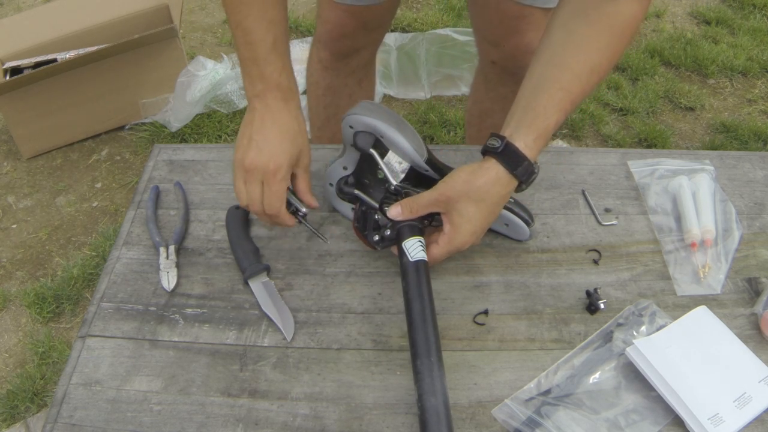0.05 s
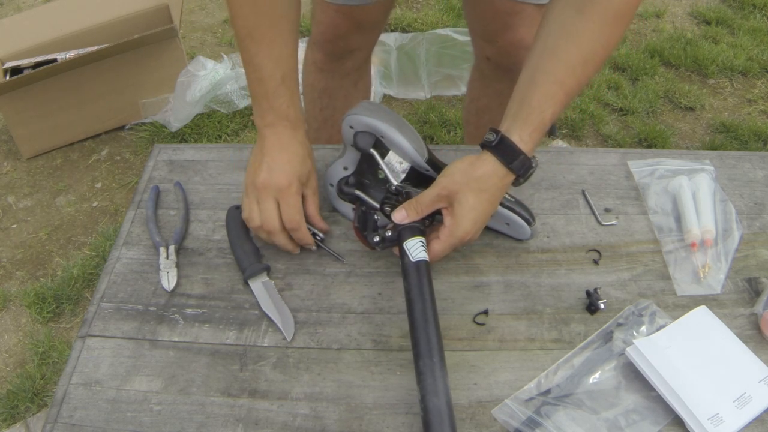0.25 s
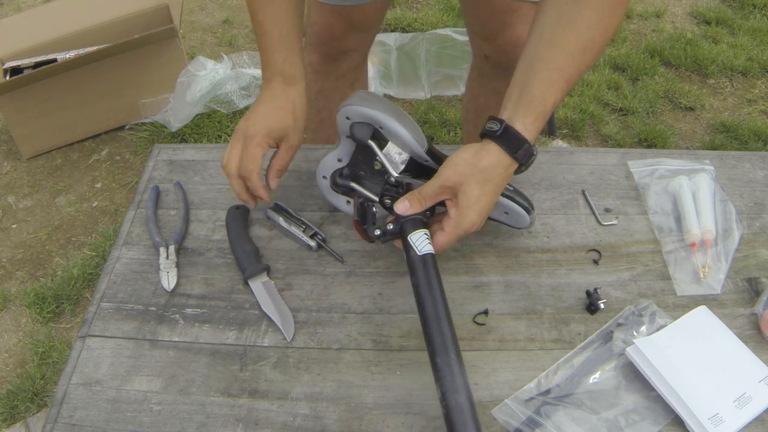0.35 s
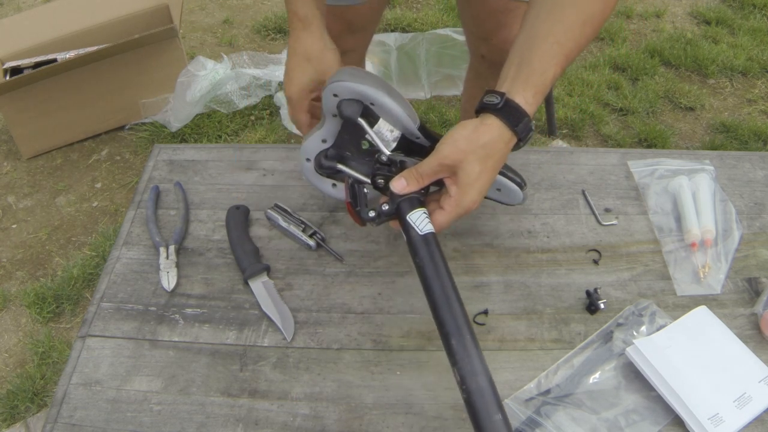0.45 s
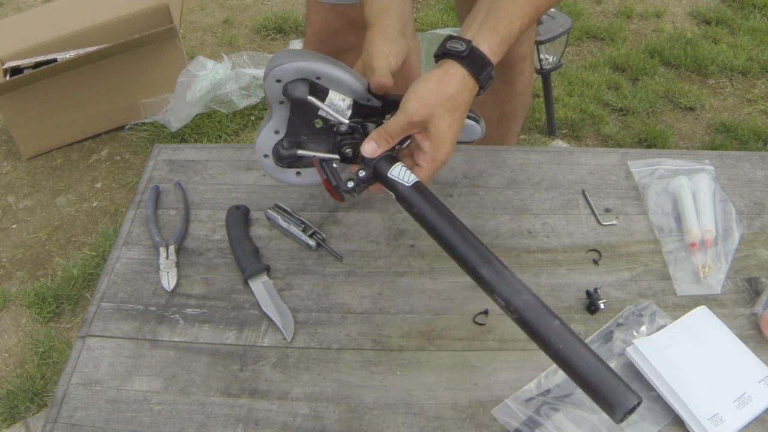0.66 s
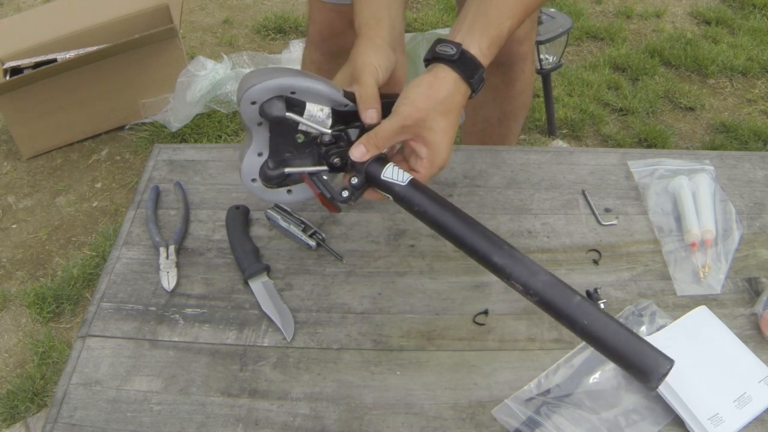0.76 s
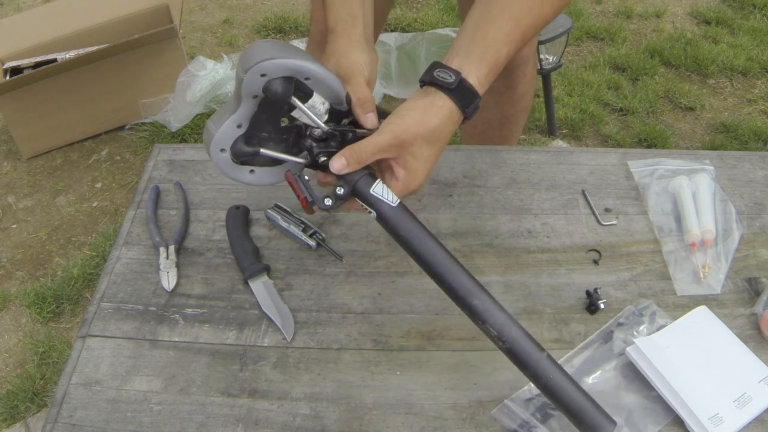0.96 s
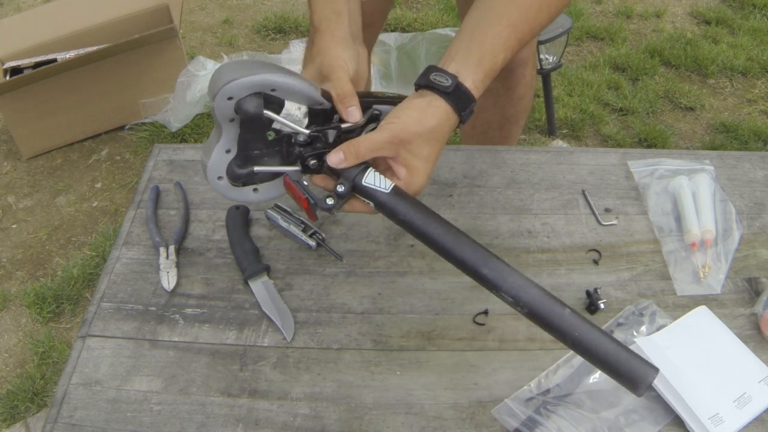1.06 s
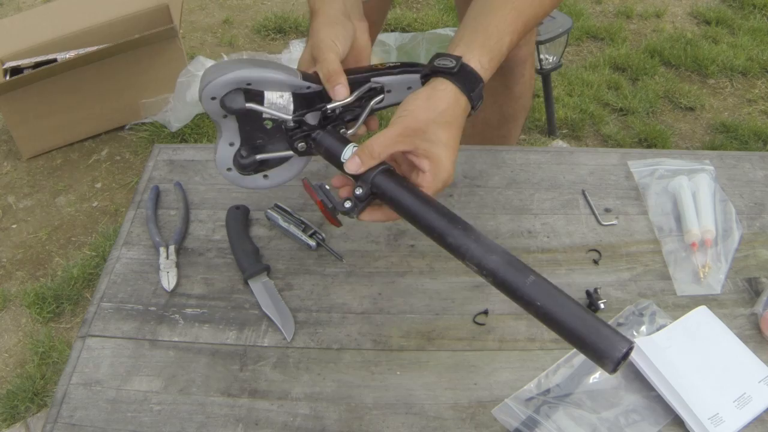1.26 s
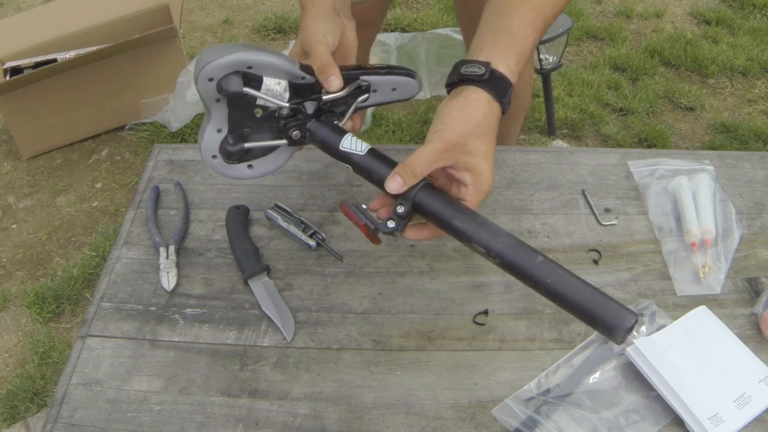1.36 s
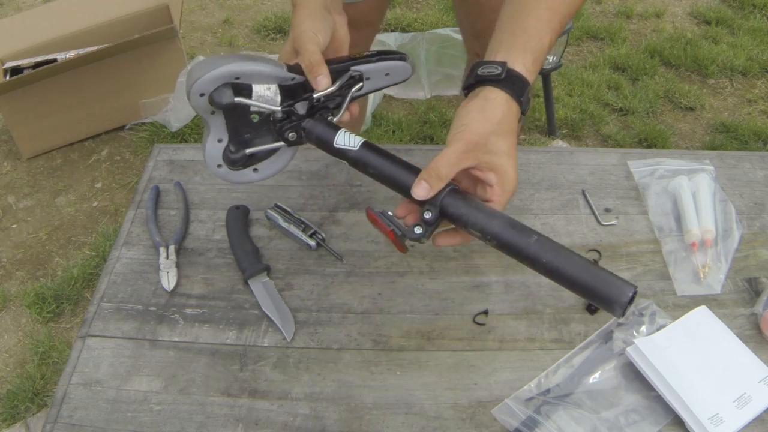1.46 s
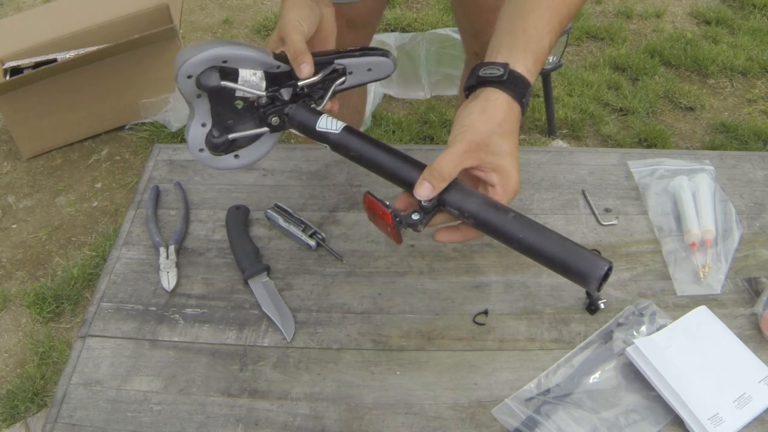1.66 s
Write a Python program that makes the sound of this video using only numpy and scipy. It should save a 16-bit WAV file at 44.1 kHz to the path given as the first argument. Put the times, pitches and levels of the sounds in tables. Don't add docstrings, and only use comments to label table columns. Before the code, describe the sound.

A small steel tool is dropped on a wooden outdoor table, knocking hard and rattling to rest; then a clamp clicks and a hand rubs and squeaks along a hollow metal tube, close microphone, light wind.

```python
import sys
import numpy as np
from scipy import signal
from scipy.fft import rfft, irfft, next_fast_len
from scipy.io import wavfile
from scipy.ndimage import uniform_filter1d, map_coordinates

SR = 44100
rng = np.random.default_rng(int(sys.argv[2]) if len(sys.argv) > 2 else 0)


def unload_wav(signal):
    wavfile.write(
        sys.argv[1],
        SR,
        np.round(np.clip(np.atleast_2d(signal).T, -1, 1) * 32767).astype(np.int16),
    )


def undo_db(level):
    steps = np.asarray(level, float) / 20
    return 10 ** steps


N = 74970
T = np.arange(N) / SR
GRIP_DB, GRIP_RATE = 1.6, 45


def unit(x):
    return x / np.sqrt(np.mean(x ** 2) + 1e-20)


def filtered(x, response):
    m = next_fast_len(len(x) + 8192)
    return irfft(rfft(x, m) * response(np.fft.rfftfreq(m, 1 / SR)), m)[:len(x)]


def coloured(points, size):
    f, db = np.transpose(points)
    noise = rng.standard_normal(size)
    return unit(filtered(noise, lambda hz: undo_db(np.interp(np.log(hz + 1), np.log(f), db))))


def resonant(x, peaks):
    def response(f):
        total = 0
        for k, (centre, width, db) in enumerate(peaks):
            damping = 1j * f * width
            total = total + (-1) ** k * undo_db(db) * damping / (centre * centre - f * f + damping)
        return total
    return filtered(x, response)


def wobble(rate):
    return map_coordinates(rng.standard_normal(4000), [T * rate])


def curve(s, db):
    return undo_db(np.interp(T, s, db, -120, -120))


def add(out, s, x):
    part = out[round(s * SR):][:len(x)]
    part += x[:len(part)]


def tool_blows():
    # (time [s], force [dB], contact length [ms], bite [dB])
    contacts = [(0.185, -40, 5.7, -13), (0.196, -32.5, 6.2, -16), (0.2233, -30.5, 1.28, 4),
                (0.2295, -13.5, 1.586, -3.5), (0.2323, -22, 2.2, 1.5), (.240, -23, 2.24, -4),
                (.2462, -27.5, 1.6, -6), (0.260, -21.5, 4, 7), (0.268, -20.5, 5.1, -7),
                (0.2944, -4.5, 1.356, -1), (0.297, -9, 1.425, -3.5), (0.2985, -12, 1.196, -2.5),
                (0.3018, -19, 2, 9), (0.3084, -20.5, 2.7, 5), (0.3126, -15.5, 2.5, -3.5),
                (0.3162, -15, 1.644, -8), (0.33, -28.5, 2.3, 0), (0.338, -28.5, 6.3, -2),
                (0.363, -28.5, 3.4, -7), (0.372, -22.5, 3, -18), (0.3789, -28, 3.7, -8),
                (0.3836, -22, 2.7, -8.5), (0.388, -24.5, 3, 2), (0.3983, -23, 2.52, -6),
                (0.404, -22, 2.8, -10), (0.4150, -26.5, 4.5, -10), (0.46, -27.5, 2.6, -14),
                (.4655, -33, 4.5, -12), (0.49, -28, 3.55, -17), (0.523, -35, 3, -14), (.530, -36, 3.2, -21),
                (0.552, -36, 3, -14), (0.558, -38, 4, -8), (0.587, -40, 4.6, -5), (0.624, -42.5, 4.4, -6),
                (.686, -47, 6.2, -8)]
    # (frequency [Hz], level [dB], t60 [s])
    planks = [(109, -10.5, 0.18), (148.6, -6.5, 0.12), (183.6, -2, 0.099), (222.6, -0.5, 0.081),
              (267, -2.5, 0.051), (313, -4, 0.036), (364, 1.5, 0.019), (473, -15.5, 0.013),
              (584, -23, 0.13)]
    # (frequency [Hz], level [dB], t60 [s])
    edge_spot = [(632, -1.5, .045), (762, -4.5, 0.064), (940, -1.5, 0.026), (1100, 1, .03),
                 (1730, -0.5, 0.05), (2320, 7.5, 0.032)]
    # (frequency [Hz], level [dB], t60 [s])
    flat_spot = [(648, -1, .045), (755, -11.5, 0.03), (900, -3.5, 0.012), (1022, 5, 0.018),
                 (1220, -9.5, 0.016), (1450, 4.5, 0.027), (1560, -3, 0.05), (1737, 7, 0.051),
                 (2464, 2.5, .03)]
    # (frequency [Hz], level [dB])
    crack_spectrum = [(300, -3.5), (1500, 7.5), (2100, -8), (3500, -6.5), (4100, -22.5), (6000, -37.5),
                      (10000, -45), (14000, -63)]
    flat_from_s, bite_above_hz, scatter_db = 0.28, 1200, 1.5
    crack_db, crack_t60, crack_rise_s, hardness = -13.5, 0.028, 0.0008, 2.4

    out, t = np.zeros(N), T[:SR // 4]
    for s, db, ms, bite_db in contacts:
        modes = planks + (edge_spot if s < flat_from_s else flat_spot)
        hz, level_db, t60 = np.transpose(modes)[:, :, None]
        level_db = level_db + scatter_db * rng.standard_normal(hz.shape)
        level_db = level_db + bite_db * (hz > bite_above_hz)
        ring = np.sum(undo_db(level_db - 60 * t / t60) * np.sin(2 * np.pi * hz * t), axis=0) / 2.59
        push = np.sin(2 * np.pi * np.clip(1000 * t[:400] / ms, 0, 1))
        thud = np.convolve(ring, push / np.abs(push).sum())[:len(t)]
        crack = coloured(crack_spectrum, size=len(t)) * undo_db(crack_db + bite_db - 60 * t / crack_t60)
        crack *= (1 - np.exp(-(t / crack_rise_s) ** 2)) / ms ** hardness
        add(out, s, undo_db(db) * (thud + crack))
    return out


def loose_things():
    # (time [s], level [dB])
    shiver = [
        (.165, -68),
        (.235, -45),
        (.285, -54),
        (.3, -36),
        (.345, -47),
        (.39, -47),
        (.5, -54),
        (.7, -70),
    ]
    # (frequency [Hz], level [dB])
    spectrum = [(70, -31.5), (130, -10), (250, 10.5), (600, -10), (1100, -16.5), (2000, -40.5), (4000, -52),
                (8000, -92)]
    s, db = np.transpose(shiver)
    return coloured(spectrum, size=N) * curve(s, db) * undo_db(3 * wobble(71.85))


def table():
    radiates = signal.butter(3, 108, 'high', fs=SR, output='sos')
    return signal.sosfilt(radiates, tool_blows() + loose_things())


def metal_clicks():
    # (time [s], peak [dB], ring [Hz], t60 [s])
    clicks = [(.226, -52.5, 4100, 0.011), (0.2295, -53.5, 9780, 0.0057), (0.2298, -57, 8000, 0.0074),
              (.230, -57, 5600, .01), (0.295, -56.5, 9500, .005), (0.311, -56.5, 4620, 0.016),
              (0.560, -63, 1700, 0.015), (.650, -55, 1990, 0.022), (0.7578, -47.5, 3470, 0.0036),
              (.760, -57.5, 960, 0.026), (0.798, -49.5, 1210, 0.02), (.839, -52.5, 900, 0.05),
              (0.8835, -51, 3520, 0.015), (0.8823, -40, 1630, 0.016), (0.884, -45, 820, 0.017),
              (0.8882, -32, 4750, 0.0041), (.8886, -48, 7200, .006), (.8905, -43, 3040, 0.018),
              (0.8914, -37, 1585, 0.025), (0.8942, -38.5, 955, 0.011), (.896, -42, 1190, 0.026),
              (.897, -42, 730, 0.037), (.900, -50.5, 699, 0.19), (.909, -56, 3270, 0.014),
              (0.919, -50, 1830, 0.013), (.923, -51, 870, .03), (0.9353, -45, 3650, 0.0064),
              (0.9376, -50.5, 1860, 0.037), (.952, -55, 1390, .015), (.977, -56, 1770, 0.018),
              (1.073, -52.5, 870, 0.04), (1.0885, -47, 570, 0.044), (1.0884, -48, 1700, 0.02),
              (1.089, -49, 900, 0.024)]
    # (frequency [Hz], level [dB])
    snap_spectrum = [(400, 0), (1200, 8), (3000, 2.5), (4500, 1.5), (6200, -18), (7500, -13.5),
                     (11000, -23.5), (14000, -42)]
    snap_db, snap_t60, rise_s = -3, 0.012, 0.00044
    out, t = np.zeros(N), T[:SR // 5]
    for s, db, hz, t60 in clicks:
        snap = coloured(snap_spectrum, size=len(t)) * undo_db(snap_db - 60 * t / snap_t60)
        ring = undo_db(-60 * t / t60) * np.sin(2 * np.pi * hz * t)
        add(out, s, undo_db(db) * (snap + ring) * (1 - np.exp(-t / rise_s)))
    return out


def rub():
    # (time [s], pressure [dB])
    pressure = [(.98, -91), (1.01, -65), (1.088, -64.5), (1.125, -81), (1.167, -57), (1.228, -54),
                (1.287, -49), (1.346, -53), (1.353, -64), (1.358, -51.5), (1.383, -53.5), (1.394, -70),
                (1.41, -51), (1.427, -63), (1.455, -51.5), (1.469, -68), (1.518, -59), (1.535, -92)]
    # (centre [Hz], width [Hz], level [dB])
    tube = [(390, 120, -16.5), (870, 320, -2.5), (1700, 710, -0.5), (2680, 430, -8), (3795, 220, -3),
            (4360, 216, -3.5), (4760, 200, -7.5), (5620, 250, -10), (6120, 350, -15.5), (8920, 190, -12.5),
            (8750, 2200, -18), (10030, 180, -12), (10700, 130, -20.5), (12000, 1100, -35)]
    grit = rng.standard_normal(N) * undo_db(1.8 * wobble(500))
    out = np.zeros(N)
    for k, peak in enumerate(tube):
        gripped = grit * undo_db(GRIP_DB * wobble(GRIP_RATE))
        out += (-1) ** k * resonant(gripped, [peak])
    s, db = np.transpose(pressure)
    return unit(out) * curve(s, db)


def squeak():
    # (time [s], pitch [Hz], level [dB])
    glide = [(1.163, 910, -64), (1.176, 1030, -54.5), (1.186, 1398, -58), (1.203, 1406, -51.5),
             (1.218, 1174, -56.5), (1.245, 1072, -53.5), (1.257, 1409, -54), (1.27, 1540, -49.5),
             (1.283, 1794, -49), (1.301, 1625, -63.5), (1.32, 1700, -48)]
    # (multiple of the pitch, level [dB])
    overtones = [(2, -21), (3, -27)]
    s, hz, db = np.transpose(glide)
    pitch = np.interp(T, s, hz) * (1 + 0.009 * wobble(250))
    phase = 2 * np.pi * np.cumsum(pitch) / SR
    gain = uniform_filter1d(curve(s, db), size=200) * undo_db(2 * wobble(150))
    tone = np.sin(phase)
    for multiple, level_db in overtones:
        tone += undo_db(level_db + GRIP_DB * wobble(GRIP_RATE)) * np.sin(multiple * phase)
    return np.sqrt(2) * gain * tone


def slips():
    # (time [s], length [s], frequency [Hz], level [dB])
    bursts = [(1.023, 0.016, 350, -54), (1.054, 0.028, 390, -56.5), (1.142, 0.047, 390, -54.5),
              (1.323, 0.007, 390, -44), (1.327, 0.018, 870, -58), (1.343, 0.014, 1476, -51.5),
              (1.362, 0.016, 390, -47.5), (1.365, 0.026, 900, -46), (1.376, 0.0081, 1414, -44.5),
              (1.391, 0.018, 330, -54), (1.402, 0.0051, 857, -46.5), (1.439, .01, 1150, -54),
              (1.445, 0.011, 1480, -47), (1.454, 0.0089, 1600, -44.5), (1.466, 0.013, 380, -49),
              (1.465, .012, 860, -51), (1.487, 0.019, 815, -47.5), (1.521, 0.031, 860, -57),
              (1.52, 0.011, 1740, -51), (1.527, 0.024, 390, -49.5), (1.598, 0.0082, 390, -54.5),
              (1.636, 0.013, 390, -54)]
    out = np.zeros(N)
    waver = np.cumsum(0.02 * wobble(200)) / SR
    for s, length, hz, db in bursts:
        swell = np.exp(-(3 * (T - s) / length) ** 2)
        out += undo_db(db) * swell * np.sin(2 * np.pi * hz * (T + waver))
    return out


def palm():
    # (time [s], level [dB])
    shifting = [(0, -85), (.06, -72), (0.141, -72.5), (.2, -90), (.76, -79), (.8, -68), (.98, -72),
                (1.03, -62), (1.1, -65), (1.19, -56.5), (1.25, -78), (1.33, -59), (1.5, -63), (1.7, -71)]
    # (centre [Hz], width [Hz], level [dB])
    saddle = [(350, 80, 4), (542, 58, 0.5), (597, 120, -2), (900, 100, -4)]
    s, db = np.transpose(shifting)
    gain = undo_db(np.interp(T, s, db, -120) + 3.8 * wobble(60.45))
    return unit(resonant(rng.standard_normal(N), saddle)) * gain


def yard_echo(near):
    yard_db, yard_t60, delay = -13, 0.12, 250
    t = T[:SR // 3]
    tail = rng.standard_normal(len(t)) * undo_db(-60 * t / yard_t60)
    late = np.pad(near, (delay, 0))
    return undo_db(yard_db) * signal.fftconvolve(late, tail / np.linalg.norm(tail))[:N]


def wind():
    # (time [s], buffet [dB])
    gusts = [(0.0, -58), (0.118, -57.5), (0.15, -62.5), (0.202, -53), (0.273, -53), (0.672, -56),
             (1.112, -60), (1.15, -53), (1.324, -58), (1.354, -54), (1.624, -57.5), (1.7, -49.5)]
    # (frequency [Hz], level [dB])
    rumble = [(12, -16), (30, 1.5), (60, -14), (110, -14), (200, -25), (400, -120)]
    s, db = np.transpose(gusts)
    return unit(coloured(rumble, size=N) * undo_db(1.02 * wobble(12))) * undo_db(np.interp(T, s, db))


def insects():
    # (centre [Hz], width [Hz], level [dB])
    band = [(2740, 600, 0)]
    chorus = resonant(resonant(rng.standard_normal(N), band), band)
    return undo_db(-76) * unit(chorus * undo_db(1.5 * wobble(60)))


def air():
    # (frequency [Hz], level [dB])
    hiss = [(70, -7.5), (125, -6.5), (230, -8), (500, -14), (1000, -18.5), (2000, -20), (5000, -26),
            (15400, -39.5)]
    return undo_db(-65.5 + 0.8 * wobble(7.1)) * coloured(hiss, size=N)


def scene():
    near = table() + metal_clicks() + rub() + squeak() + slips() + palm()
    return (near + yard_echo(near) + wind() + insects() + air())[None]


def top_cut(x):
    return signal.sosfilt(signal.butter(12, 15300, fs=SR, output="sos"), x)


def record(dry):
    mix = filtered(dry[0], lambda hz: hz < 15300)[None]
    return top_cut(mix)


dry = scene()
out = record(dry)
unload_wav(out)
```